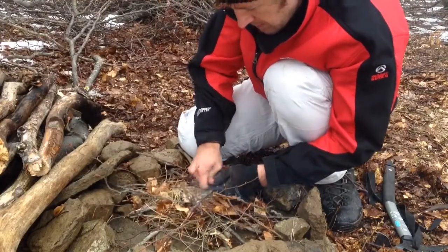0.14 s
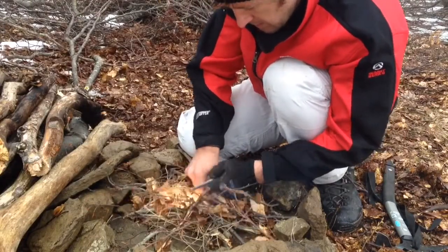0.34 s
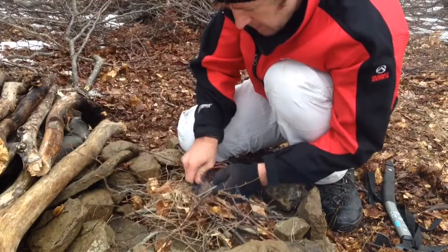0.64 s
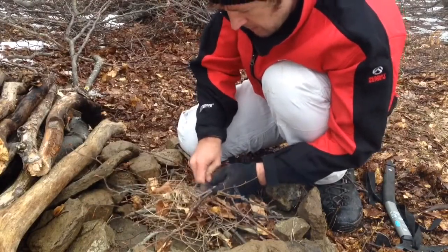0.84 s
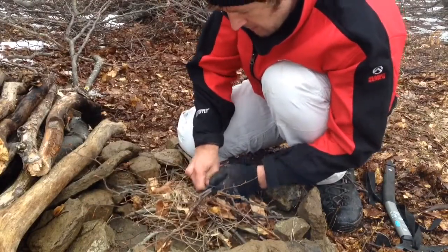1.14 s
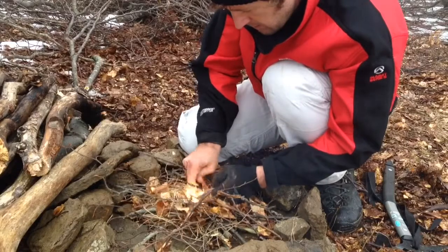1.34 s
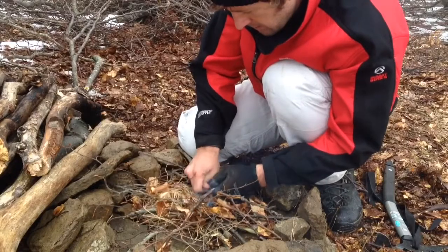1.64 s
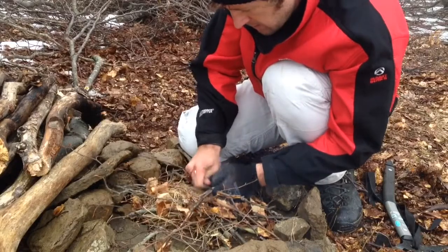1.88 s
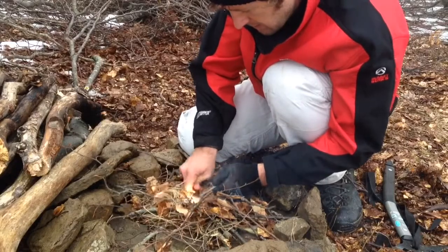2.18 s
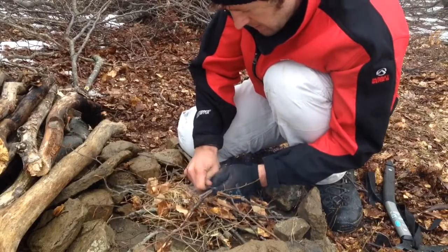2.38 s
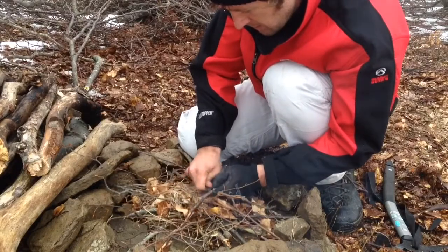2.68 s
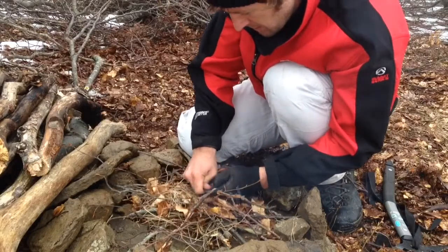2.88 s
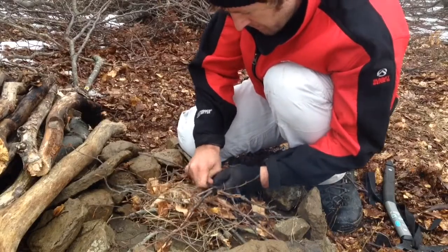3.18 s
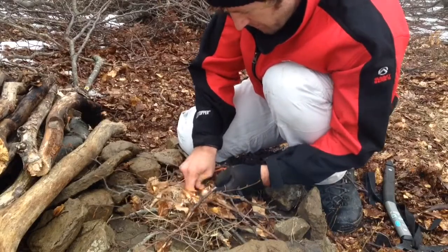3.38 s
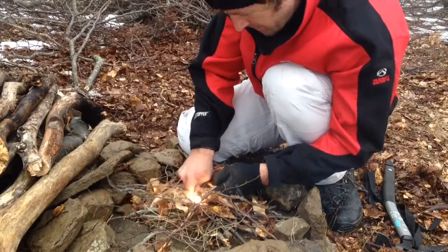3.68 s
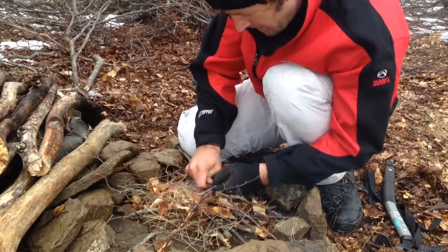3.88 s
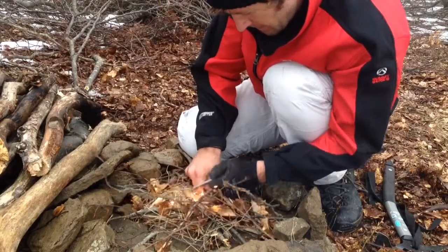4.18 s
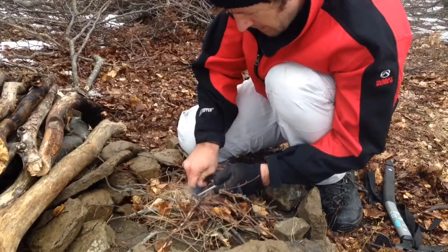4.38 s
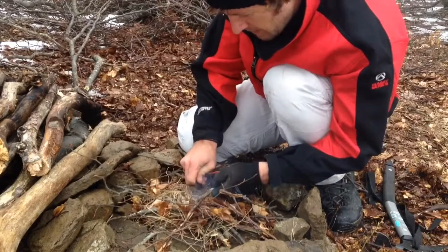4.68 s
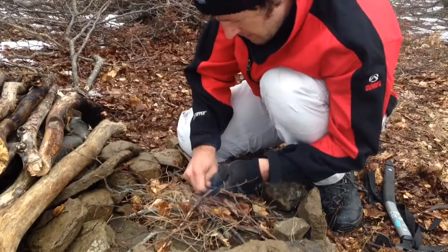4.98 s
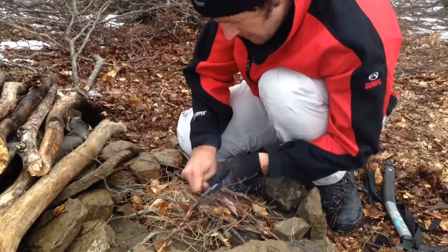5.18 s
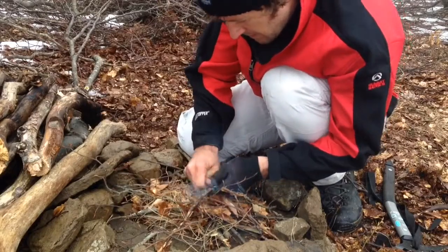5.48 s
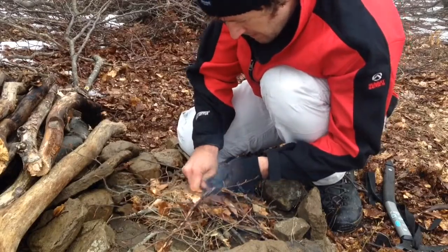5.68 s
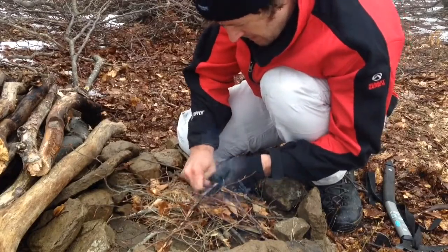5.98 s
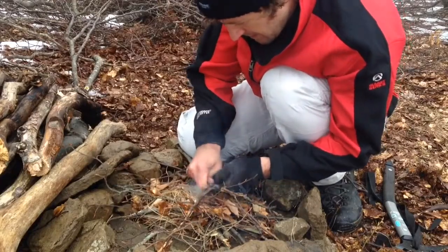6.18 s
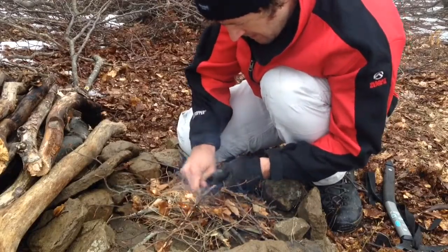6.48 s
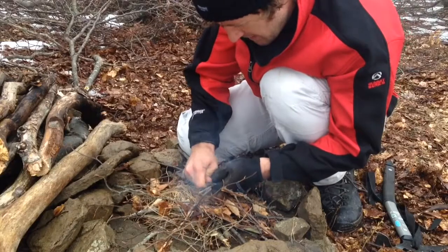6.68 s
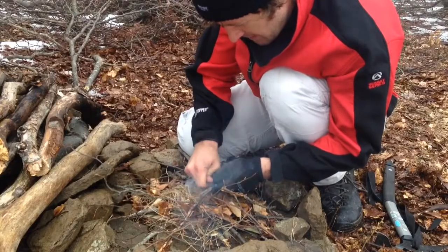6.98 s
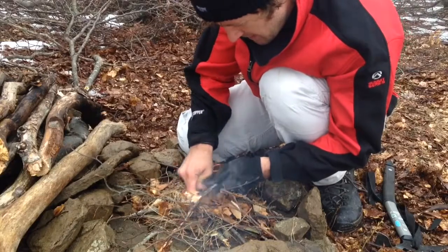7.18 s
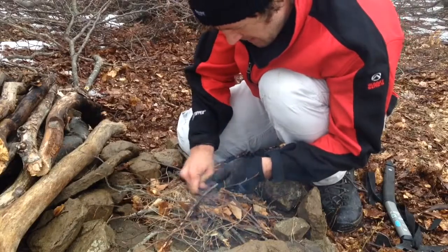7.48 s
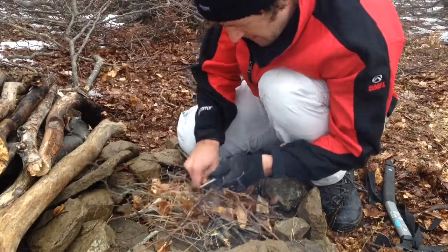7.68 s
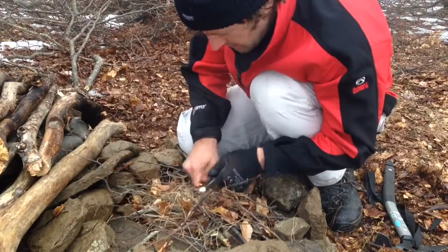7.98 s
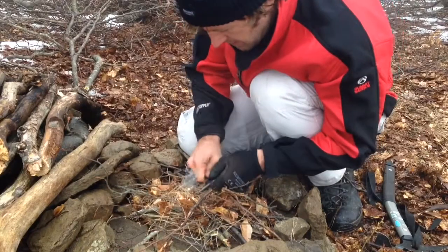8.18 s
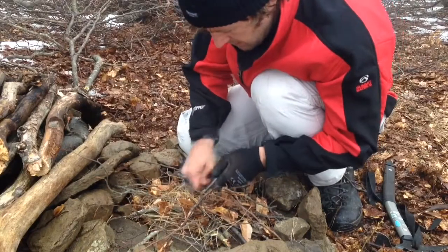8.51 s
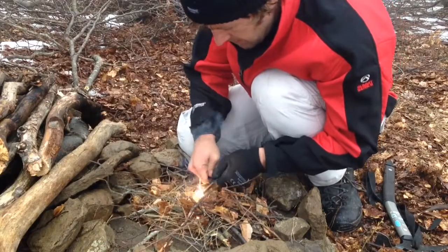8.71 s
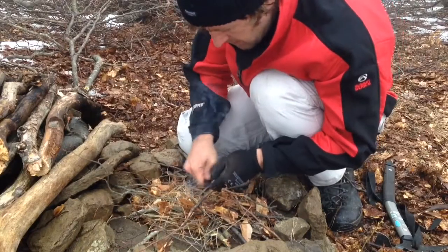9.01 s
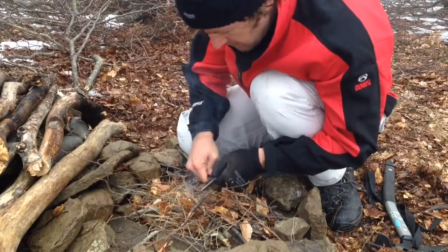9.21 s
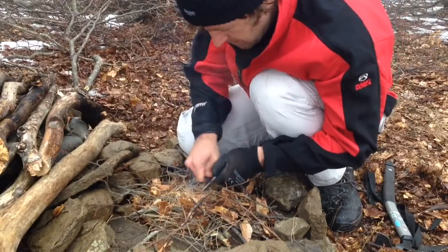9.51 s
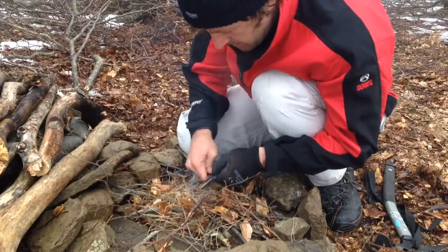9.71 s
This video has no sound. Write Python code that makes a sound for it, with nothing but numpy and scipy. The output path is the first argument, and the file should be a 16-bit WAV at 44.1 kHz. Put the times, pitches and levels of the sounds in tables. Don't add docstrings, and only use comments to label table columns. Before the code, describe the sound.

Outdoors, close and dry, with faint steady hiss from a small camera. Light rod hum and leaf rustle open, then a hard scrape bites at 0.4 seconds: gritty, piercing, its squeal climbing as tinder crunches and the ground thuds softly. Clinks, a tap and ticking leaves follow. More strokes come at 1.4, 1.8, 2.25 and 2.6, with bright metal clinks around 2, then light drags near 3. Strong scrapes land at 3.4, 3.8 and 4.2, the last among the loudest. From 4.4 to 5.2 it eases to a sharp clink, a small ring, rustling and crackles. Scrapes resume at 5.3 and 5.7, then run fairly evenly at 6.1, 6.5, 6.9, 7.2 and 7.6. Near 7.8 sound cuts almost to silence and fades back within a tenth of a second. Strokes follow at 8.1 and 8.6, clinks and light drags around 9, and a final rough scrape with skids and clicks from 9.5.

```python
import sys
import numpy as np
from scipy import signal
from scipy.io import wavfile
from scipy.ndimage import uniform_filter1d

SR = 44100
rng = np.random.default_rng(int(sys.argv[2]) if len(sys.argv) > 2 else 0)


def nominal_scale(level):
    x = np.asarray(level, float) / 20
    return 10 ** x


def unload_audio(sound):
    columns = np.transpose(np.atleast_2d(sound))
    steps = np.round(np.clip(columns, -1, 1) * 32767)
    wavfile.write(sys.argv[1], SR, steps.astype(np.int16))


N = 434385


def evened(x):
    return x / np.sqrt(np.mean(x ** 2) + 1e-20)


def colour(x, points):
    hz, db = np.transpose(points)
    grid = np.abs(np.fft.fftfreq(4096, 1 / SR))
    gain_db = np.interp(np.log(grid + 1), np.log(hz), db)
    log_gain = np.log(nominal_scale(np.maximum(gain_db, -80)))
    taps = np.fft.ifft(np.exp(np.conj(signal.hilbert(log_gain)))).real[:2048]
    return signal.oaconvolve(x, taps)[:len(x)]


def resonate(x, hz, width_hz):
    turn = np.exp(2j * np.pi * np.cumsum(hz * np.ones(len(x))) / SR)
    r = np.exp(-np.pi * width_hz / SR)
    return 2 * (turn * signal.lfilter([1 - r], [1, -r], x / turn)).real


def wander(seconds):
    size = max(int(seconds * SR), 2)
    return evened(uniform_filter1d(uniform_filter1d(rng.standard_normal(N), size), size))


def grit(per_s, spread_db, flutter_db, flutter_s):
    luck, size, sign = rng.random(N), rng.exponential(1, N), rng.standard_normal(N)
    breaks = (luck < per_s / SR) * np.clip(sign, -2, 2) * nominal_scale(spread_db * np.minimum(size, 3))
    return evened(breaks) * nominal_scale(flutter_db * wander(flutter_s))


def rings(x, modes, drift, come_go_db):
    out = np.zeros(N)
    for hz, width_hz, db in modes:
        come_go = nominal_scale(np.clip(come_go_db * wander(.02), -12, 4))
        mode_hz = hz * (1 + drift * wander(0.041))
        out += come_go * nominal_scale(db) * evened(resonate(x, mode_hz, width_hz))
    return out


def swell(peak, rise, fall, more=0):
    first = max(round((peak - rise) * SR), 0)
    last = min(round((peak + fall + more) * SR), N)
    t = np.arange(first, last) / SR
    return t, np.interp(t - peak, [-rise, 0, fall], [-1, 0, 1])


def samples(t):
    return np.round(t * SR).astype(int)


# pitch_hz, level_db (per Hz)
HISS_SPECTRUM = [(24, -57), (40, -8), (69, -6), (259, -9.5), (367, -12.5), (406, -10), (737, -16),
                 (1600, -18.5), (1950, -19), (15400, -26.5)]


def hiss():
    t = np.arange(N) / SR
    air = evened(colour(rng.standard_normal(N), HISS_SPECTRUM))
    passing = 0.22 * np.exp(-((t - 6.6) / 1.8) ** 4)
    drone = passing * evened(resonate(rng.standard_normal(N), 1550, 200))
    wood = np.zeros(N)
    for s in (5.025, 5.058):
        wood += 3.0 * np.sin(2 * np.pi * 480 * t) * np.exp(-((t - s) / 0.0042) ** 2)
    return nominal_scale(-58.5) * (air + drone + wood) * nominal_scale(.7 * wander(.15))


# pitch_hz, level_db (per Hz)
CRACK_SPECTRUM = [(290, -75), (500, 14), (1160, -22.5), (3980, 2), (5630, 5), (13400, -6.5), (16000, -14)]
# start_s, peak_db, ring_hz
CRACKLES = [(0.758, -38, 5500), (0.809, -38, 3500), (1.031, -45, 2500), (1.071, -42, 6000),
            (1.119, -39, 8500), (3.617, -41, 5500), (4.653, -41, 4000), (4.673, -43, 9000),
            (4.758, -41, 4000), (4.877, -42, 1500), (4.978, -43, 9000), (5.056, -41, 4500),
            (5.125, -44, 6000), (5.167, -45, 4000)]
# start_s, peak_db, ring_hz
SNAPS = [(0.0587, -19, 13200), (0.0681, -22, 12800), (0.4304, -18, 700), (0.454, -15, 13300),
         (0.5886, -32, 4500), (0.6529, -30, 11800), (1.2731, -34, 4700), (1.3347, -18, 12900),
         (1.4127, -21, 6200), (1.4259, -22, 3500), (1.4605, -25, 6200), (1.8772, -17, 4700),
         (1.9354, -33, 7500), (2.2021, -21, 12700), (2.2117, -20, 12700), (2.2389, -16, 5400),
         (2.2553, -20, 5600), (2.2909, -24, 1400), (2.3467, -27, 13600), (2.6629, -23, 5900),
         (2.6808, -23, 5800), (2.7274, -26, 5100), (2.9915, -23, 12700), (3.0132, -29, 13800),
         (3.375, -17, 14600), (3.4511, -17, 12300), (3.4591, -16, 13600), (3.4808, -25, 5900),
         (3.5135, -31, 5800), (3.8398, -20, 1300), (4.3059, -24, 2800), (4.3239, -25, 6500),
         (4.4324, -20, 8500), (4.8664, -35, 4100), (5.3642, -20, 13200), (5.3888, -19, 13000),
         (5.4172, -24, 1800), (5.7474, -28, 5300), (5.7732, -26, 1600), (6.0817, -16, 13700),
         (6.0921, -14, 13400), (6.2677, -33, 7100), (6.5424, -14, 6900), (6.5528, -18, 6000),
         (6.6637, -31, 5600), (6.991, -31, 12900), (7.2388, -21, 5000), (7.5862, -14, 5300),
         (7.6876, -17, 13000), (8.1782, -20, 4300), (8.7394, -19, 1900), (8.8179, -27, 12700),
         (8.8726, -21, 12200), (8.9487, -35, 2400), (9.5366, -23, 14800), (9.5658, -18, 4300),
         (9.6174, -18, 6900), (9.6642, -23, 13100), (9.6786, -20, 6200), (9.7852, -24, 6400)]


def snaps():
    out, t = np.zeros(N + 400), np.arange(400) / SR
    for s, peak_db, hz in SNAPS + CRACKLES:
        spit = evened(colour(rng.standard_normal(400), CRACK_SPECTRUM))
        sound = .5 * spit + 0.81 * np.sin(2 * np.pi * hz * t)
        fall = nominal_scale(peak_db + 2 - 60 * t / 0.0038)
        out[round(s * SR):][:400] += fall * np.minimum(t / .0003, 1) * sound
    return out[:N]


# peak_s, length_s, lower_mode_hz, level_db
HUMS = [(0.031, 0.065, 1410, -47.5), (0.192, 0.072, 1180, -50), (0.327, 0.087, 1350, -49.5),
        (1.328, 0.065, 1400, -56), (2.609, 0.066, 1420, -45.5), (2.771, 0.034, 1170, -50.5),
        (2.969, 0.055, 1330, -52.5), (3.191, 0.048, 1210, -48.5), (3.378, 0.033, 1500, -38.5),
        (5.794, 0.015, 1740, -42), (5.773, .012, 1700, -44), (6.826, .05, 1290, -61),
        (7.167, 0.049, 1370, -53.5), (7.321, .05, 1050, -53.5), (7.613, 0.057, 1060, -36),
        (9, 0.042, 1220, -55), (9.105, 0.055, 1080, -50)]


def hums():
    out, drive = np.zeros(N), grit(4000, 1.0, 0.74, .005)
    for peak, length, hz, db in HUMS:
        t, away = swell(peak, length / 2, length / 2)
        at = samples(t)
        lower = evened(resonate(drive[at], hz, 170))
        upper = evened(resonate(drive[at], 1.93 * hz, 340))
        out[at] += nominal_scale(db) * np.sqrt(1 - away ** 2) * (lower + nominal_scale(-1.5) * upper)
    return out


# start_s, peak_db, ring_hz, knock_hz, knock_db (over the peak)
CLINKS = [(0.6475, -18, 12500, 7600, -6), (0.7157, -21, 8600, 1840, -13), (1.501, -27.5, 6150, 1580, -1),
          (1.8062, -18.5, 6100, 1510, -7), (1.926, -23.5, 7560, 2680, -12), (1.9666, -9, 5500, 1230, -8.5),
          (2.347, -28, 6840, 2210, -14), (2.3555, -19.5, 7040, 1490, -11), (2.4035, -29, 2940, 1790, 3),
          (3.5738, -25, 12100, 4600, -6), (4.4966, -11, 6100, 4620, -15.5),
          (5.4968, -29.5, 6930, 2200, -30), (6.2834, -12.5, 10400, 5800, -11),
          (6.293, -32, 12100, 5200, -8), (6.3218, -18.5, 13000, 5100, -10), (8.048, -24, 12300, 1040, 5.5),
          (8.2442, -29, 14700, 4500, -10), (8.7584, -16.5, 11400, 4400, -7), (8.797, -12, 12100, 6160, -8),
          (8.8892, -13, 4000, 1700, -6), (8.947, -43, 6400, 2830, 8), (9.686, -9.5, 6060, 2040, -18),
          (9.7493, -33, 5500, 1500, -3)]
# start_s, peak_db, ring_hz, knock_hz, knock_db (over the peak)
TAPS = [(0.611, -15, 9000, 6300, -4.5), (0.884, -19.5, 6000, 1480, -6), (1.5636, -12, 5360, 1240, -12),
        (1.6244, -31.5, 4660, 939, -20), (2.384, -17, 5400, 1190, -3), (3.5368, -21, 4000, 1060, -4),
        (3.738, -13, 13000, 7370, -7), (4.8262, -20, 4400, 1820, -3), (4.865, -36, 3950, 2010, 0),
        (5.5128, -21, 5930, 2770, -34), (5.5404, -34, 5500, 1560, -10), (6.2672, -30, 7300, 1450, -8),
        (6.663, -33, 5400, 2790, -10), (6.99, -35, 5300, 1300, -7), (7.625, -12, 6300, 1530, -12),
        (7.8346, -34, 3220, 2510, -18), (8.2549, -17.5, 4280, 1780, -9), (8.919, -34, 3730, 1160, -1),
        (0.905, -42, 4500, 1700, 5), (1.275, -32, 4070, 2600, -15), (1.446, -20, 3000, 600, -11),
        (5.965, -40, 6040, 2000, -20), (7.4, -42.5, 4000, 1180, 1), (9.212, -59, 5000, 1500, -10)]


def ticks():
    out, t = np.zeros(N + 3000), np.arange(3000) / SR
    rise = np.minimum(t / .0008, 1) ** 2
    touches = [(*row, -3 - 0.35 * (row[1] + 20)) for row in CLINKS] + [(*row, -32) for row in TAPS]
    for s, peak_db, hz, knock_hz, knock_db, ping_db in touches:
        start = round(s * SR)
        noise = rng.standard_normal(3000)
        clatter = evened(colour(noise, CRACK_SPECTRUM))
        crack = clatter * (nominal_scale(-60 * t / 0.0058) + 0.16 * nominal_scale(-60 * t / 0.033))
        ring = np.sin(2 * np.pi * hz * t) * nominal_scale(-60 * t / .008)
        ping = evened(resonate(noise, 12750, 3100)) * nominal_scale(ping_db - 60 * t / 0.0097)
        overtone = np.sin(2 * np.pi * (2350 * t + rng.random()))
        overtone_gain = 0.75 if knock_hz < 1300 else 0.25
        knock = 1.24 * np.sin(2 * np.pi * knock_hz * t) + overtone_gain * overtone
        knock = knock * nominal_scale(knock_db - 60 * t / 0.0084)
        out[start:][:3000] += nominal_scale(peak_db) * rise * (.5 * crack + 0.9 * ring + 1.2 * ping + 1.1 * knock)
        graze_s = 0.0063
        graze = t[t < graze_s]
        out[start - len(graze):start] += nominal_scale(peak_db - 38) * graze / graze_s * clatter[-len(graze):]
    free_ring = nominal_scale(-33 - 60 * t / .04) * rise * np.sin(2 * np.pi * 4520 * t)
    out[round(4.8265 * SR):][:3000] += free_ring
    return out[:N]


# pitch_hz, level_db (per Hz)
THUD_SPECTRUM = [(26, -40), (45, -33), (134, 3), (294, -5), (420, -2), (550, -16), (920, -120)]
# crunch_db, chatter_before_bite_db, chatter_after_bite_db
PUSHES = [(0.365, -36.5, -2.5, 1, 0.5), (1.363, -30, -2.5, 4, 4.5), (1.822, -48, -5.5, 1.5, 9),
          (2.25, -36.5, 1.5, 2, 7), (2.638, -43, -3.5, -1, 2), (3.425, -35.5, -0.5, 3, 8),
          (3.778, -29.5, 0.5, 4.5, 6), (4.165, -25.5, -1, 2, 4.5), (5.294, -29, -2.5, 0, 9.5),
          (5.718, -41.5, 0, 9, 6.5), (6.103, -30, -3.5, 0.5, 8), (6.504, -36, -6, 2.5, 7),
          (6.876, -32, -3, 1, 6), (7.228, -34, -7, 2, -2), (7.59, -30, -3.5, 2, 6),
          (8.091, -27, -2, 3, 3.5), (8.63, -33, -2.5, 2.5, 6), (9.516, -40, -4.5, 13, 3)]


def pushes():
    lead = 400
    t, gain, thump = np.arange(-lead, 9000) / SR, np.zeros(N), np.zeros(N)
    u = np.maximum(t + 0.0086, 0) / 0.021
    v = np.maximum(t, 0)
    swing = v / 0.0066 * np.exp(1 - v / 0.0066)
    for s, peak_db, *_ in PUSHES:
        at = round(s * SR) + np.arange(len(t)) - lead
        gain[at] += nominal_scale(peak_db - 8.0) * u * np.exp(1 - u)
        thump_hz = 108 * rng.uniform(0.67, 1.27)
        thump[at] += nominal_scale(peak_db - 6.5) * swing * np.sin(2 * np.pi * thump_hz * v)
    return gain * evened(colour(grit(900, 1.7, 3.9, 0.007), THUD_SPECTRUM)) + thump


# start_s, peak_db
SLIPS = [(0.366, -19.5), (0.423, -18), (0.453, -19), (1.8554, -21), (1.8734, -17), (2.2257, -24),
         (2.2543, -43), (2.725, -27.5), (3.456, -19), (3.479, -26), (3.838, -24), (4.305, -32),
         (5.3602, -42), (5.3875, -22), (5.414, -22), (5.7245, -21.5), (5.7907, -54), (6.08, -31),
         (6.092, -24), (6.167, -40), (6.511, -38), (6.58, -29.5), (6.9304, -19), (7.586, -19), (7.683, -20),
         (8.1735, -29), (8.869, -26), (9.614, -22.5), (9.6603, -25), (9.785, -26), (9.535, -27),
         (9.678, -25), (7.656, -26), (3.403, -26), (7.225, -26), (7.237, -25.5)]


def slips():
    t, gain = np.arange(1500) / SR, np.zeros(N + 1500)
    for s, peak_db in SLIPS:
        gain[round(s * SR):][:1500] += nominal_scale(peak_db - 13.5) * t / 0.0028 * np.exp(1 - t / 0.0027)
    return gain[:N]


# start_s, length_s, first_db, last_db
STIRS = [(0.64, 0.069, -47, -63), (0.09, 0.058, -47, -67), (0.758, 0.098, -51, -60),
         (0.888, 0.074, -53, -66), (1.024, 0.29, -61, -52), (1.58, 0.31, -62.5, -62),
         (1.922, 0.057, -57, -53), (1.994, 0.14, -57.5, -61.5), (2.812, 0.14, -66, -62),
         (3.03, .11, -46.5, -57), (3.567, 0.087, -55, -65), (3.952, 0.16, -58, -81),
         (4.493, 0.27, -63, -52), (4.754, 0.063, -61, -54), (4.823, 0.38, -51, -60),
         (5.537, 0.063, -56, -76), (7.35, 0.11, -64, -68), (8.257, 0.073, -69, -56.5),
         (8.895, 0.079, -64, -52)]
# peak_s, rise_s, fall_s, peak_db, chatter_db
DRAGS = [(0.05, 0.048, 0.042, -44.5, 14.5), (0.2, 0.083, 0.09, -45, 5.5), (0.725, .015, 0.03, -35.5, 3),
         (2.755, 0.13, 0.054, -45.5, 1.5), (2.988, 0.03, 0.04, -37, 3.5), (3.195, 0.049, 0.043, -46.5, 6),
         (5.515, .025, 0.015, -47.5, 11), (7.31, 0.077, 0.038, -48, 11), (8.797, 0.012, 0.019, -31, 5),
         (8.82, .008, 0.016, -43.5, 4), (8.768, .006, 0.0088, -44, 5), (8.872, 0.019, 0.031, -36, 3),
         (9.11, 0.064, 0.029, -45.5, 9.5)]
# peak_s, rise_s, fall_s, peak_db, chatter_db
SKIDS = [(4.434, 0.0099, 0.024, -34.5, 3.5), (8.998, 0.04, 0.029, -38, 10), (9.685, 0.034, 0.025, -31, -4),
         (9.787, 0.02, 0.027, -38.5, 1), (9.84, 0.014, .04, -38, -4), (9.82, 0.013, 0.014, -37, -2),
         (3, .003, .01, -46, 0), (8.258, 0.0045, .006, -33, 2)]
# bite_s, swell_from_touch_s, run_to_lift_s, scrape_at_bite_db, sag_until_lift_db
STROKES = [(0.38, 0.086, 0.25, -27.5, 31.5), (1.37, 0.071, 0.15, -28.5, 29),
           (1.804, 0.058, 0.11, -36.5, 17), (2.25, 0.087, 0.14, -34.5, 25),
           (2.62, 0.047, 0.074, -38.5, 4.5), (3.375, 0.047, 0.18, -33, 26), (3.765, 0.072, .17, -28.5, 24),
           (4.183, 0.068, 0.27, -25.5, 42.5), (5.29, 0.057, 0.17, -32, 19), (5.69, 0.057, 0.11, -43, 7.5),
           (6.111, 0.064, 0.17, -27.5, 37), (6.521, 0.075, .1, -29, 27.5), (6.878, 0.057, 0.16, -30, 29.5),
           (7.232, 0.083, 0.034, -31.5, 12.5), (7.606, 0.075, 0.16, -29, 18),
           (8.096, 0.072, 0.14, -26, 20.5), (8.6, 0.048, 0.1405, -32.5, 2.5),
           (9.47, 0.049, 0.17, -35.5, 1.5)]
# first_hz, last_hz, halfway_after_touch_s, squeal_db
SQUEALS = [(11300, 12600, .03, -1), (12500, 13500, .04, -0.5), (10300, 13300, .025, 0),
           (11300, 13300, .04, 1), (10100, 12600, .035, -1), (10400, 13900, .025, -3),
           (11800, 13200, .02, 0), (11100, 13300, 0.032, -1.5), (11900, 13100, .04, 1),
           (13500, 13300, .03, 0), (11800, 13500, .025, -1), (9900, 13200, .04, -1),
           (10300, 13300, 0.021, 0), (10000, 12600, .052, 1.5), (9800, 13200, 0.037, 0),
           (11700, 13600, .055, -2.5), (11500, 12400, .025, -2.5), (12200, 12900, .03, -2.5)]
# middle_s, half_width_s, change_db
DIPS_AND_SWELLS = [(9.53, 0.0036, -18), (9.548, 0.011, -3.5), (0.387, 0.0037, -4), (9.64, .01, 4), (1.868, .004, -3),
                   (3.472, 0.0055, -4), (8.683, 0.0037, -5), (5.708, 0.0054, -5), (7.205, 0.019, -7),
                   (3.354, 0.013, 8), (3.378, .01, -5), (4.28, 0.017, -5.5), (7.65, 0.019, -3), (9.582, .008, 5.5),
                   (5.6, .018, 6), (8.575, .01, 5), (6.073, .006, 0), (6.47, 0.0088, 5), (5.745, .01, 2.5),
                   (7.755, .015, -4.5), (4.155, .015, 2)]


def hand_motion():
    out = np.zeros((6, N))
    out[4:] = [[13000], [1]]

    def add(t, rod_db, chatter_db, crunch_db, age):
        at = samples(t)
        out[:3, at] += nominal_scale([rod_db, rod_db + chatter_db, rod_db + crunch_db])
        out[3, at] = age

    for start, length, first_db, last_db in STIRS:
        t, along = swell(start, 0, length)
        add(t, first_db + (last_db - first_db) * along, -1.5, -5.5, 1)
    for rows, crunch_db in ((DRAGS, -7), (SKIDS, -25)):
        for peak, rise, fall, db, chatter_db in rows:
            t, away = swell(peak, rise, fall)
            add(t, db - 16 * abs(away) ** 1.2, chatter_db, crunch_db, 1)

    touch_db, seat_db, lift_s = -56.5, -13.5, 0.011
    for stroke, push, squeal in zip(STROKES, PUSHES, SQUEALS):
        bite, rise, run, db, sag_db = stroke
        thud, _, crunch_db, early_db, late_db = push
        first_hz, last_hz, half, squeal_db = squeal
        t, away = swell(bite, rise, run, lift_s)
        age = t - bite + rise
        seat = min(0.023, .8 * rise)
        unseated = np.clip((rise - age) / (rise - seat), 0, 1) ** 1.05
        rise_db = np.interp(age, [0, seat], [touch_db - seat_db, db]) + seat_db * unseated
        sagged_db = sag_db * np.maximum(away, 0) ** 1.15
        lifted_db = -17 * np.maximum(age - rise - run, 0) / lift_s
        chatter_db = np.interp(away, [-.3, .25], [early_db, late_db])
        gather_db = np.interp(t - thud, [-0.018, 0, 0.13], [-6.5, 0, -3.5])
        add(t, rise_db - sagged_db + lifted_db, chatter_db, crunch_db + gather_db, age)
        at = samples(t)
        out[4, at] = first_hz + (last_hz - first_hz) / (1 + np.exp((half - age) / .01))
        out[5, at] = nominal_scale(squeal_db)
    for s, half, db in DIPS_AND_SWELLS:
        t, away = swell(s, 2 * half, 2 * half)
        out[:3, samples(t)] *= nominal_scale(db * np.exp(-(2 * away) ** 2))
    return uniform_filter1d(out, 200, axis=1)


# pitch_hz, level_db (per Hz)
ROD_SPECTRUM = [(1180, -29), (2000, -14), (2770, -6.5), (4490, -1), (5640, 4.5), (9500, -4), (12400, -27.5),
                (20900, -120)]
# pitch_hz, level_db (per Hz)
EDGE_SPECTRUM = [(4410, -21), (7500, -10), (9120, -11), (13300, -9), (14700, -9.5), (15400, -15.5)]
# pitch_hz, level_db (per Hz)
TINDER_SPECTRUM = [(210, -20), (350, -14), (636, -9), (1050, -13.5), (1290, -17.5), (2270, -1), (3500, -14),
                   (4550, -13), (7700, -120)]
# pitch_hz, width_hz, level_db
ROD_RINGS = [(3370, 1200, -11), (6300, 820, -1), (8370, 820, -5.5)]
# pitch_hz, width_hz, level_db
TWIG_RINGS = [(1085, 540, 0.5), (1600, 96, -4), (2480, 47, -18)]


def strokes():
    rod_gain, edge_gain, tinder_gain, age, climb_hz, squeal_gain = hand_motion()
    bitten = np.clip(age / 0.058, 0, 1)
    breaks = grit(per_s=1500, spread_db=2.2, flutter_db=1.2, flutter_s=.006) * bitten
    judder = nominal_scale(1.17 * bitten * wander(0.0041))
    chatter_hz = climb_hz + 250 * wander(0.0068)
    squeal = .25 + 1.7 * squeal_gain * np.exp(-(age / .072) ** 4)
    squeal = squeal * nominal_scale(2.2 * wander(.01))

    gripped = np.clip(rod_gain / nominal_scale(-44), .3, .85)
    rod_grit = grit(14000, 2.0, 1.1, .004) + .55 * breaks
    scrape = evened(colour(rod_grit, ROD_SPECTRUM))
    rod = scrape + gripped * rings(rod_grit, ROD_RINGS, 0.087, 4.9)
    rod += 0.12 * squeal * evened(resonate(rod_grit, chatter_hz / 2, 730))

    edge_grit = grit(18000, 1.5, 1.1, .004) + .36 * breaks
    edge = evened(colour(edge_grit, EDGE_SPECTRUM))
    edge += squeal * evened(resonate(edge_grit, chatter_hz, 650))

    tinder_grit = grit(5000, 2.5, 1.4, .008) + .45 * breaks
    loose = 1 + 0.23 * (tinder_gain < nominal_scale(-44))
    tinder = evened(colour(tinder_grit, TINDER_SPECTRUM))
    tinder += loose * rings(tinder_grit, TWIG_RINGS, 0.072, 10.0)

    rod, edge, tinder = nominal_scale(-2.4 * gripped) * evened(rod), evened(edge), evened(tinder)
    steady = judder * (rod_gain * rod + edge_gain * edge + tinder_gain * tinder)
    return steady + slips() * (rod + 1.35 * edge + 0.63 * tinder)


def scene():
    near = snaps() + hums() + ticks() + pushes() + strokes()
    echoes = np.zeros(1200)
    echoes[[0, 90, 230, 410, 700, 1100]] = 0.92, -0.0035, -0.02, 0.026, 0.02, -0.019
    return (hiss() + signal.oaconvolve(near, echoes)[:N])[None]


def low_pass(x):
    return signal.sosfilt(signal.butter(12, 16550, fs=SR, output="sos"), x)


def record(dry):
    low_cut = signal.butter(2, 51, "high", fs=SR, output="sos")
    since = np.arange(N) / SR - 7.775
    fade_in = np.clip(0.043 + since / .065, 0, 1) ** 1.44
    heard = signal.sosfilt(low_cut, dry) * np.where(since < 0, 1, fade_in)
    top_cut = signal.firwin(301, 15350, window=("kaiser", 6), fs=SR)
    body = signal.oaconvolve(heard, top_cut[None], "same")
    quick = uniform_filter1d(body ** 2, 130, axis=1)
    slow = uniform_filter1d(body ** 2, 2600, axis=1)
    sudden = uniform_filter1d(1. * (quick > 7 * slow), 200, axis=1)
    mix = body + nominal_scale(-24) * sudden * (heard - body)
    return low_pass(mix)


dry = scene()
out = record(dry)
unload_audio(out)
```